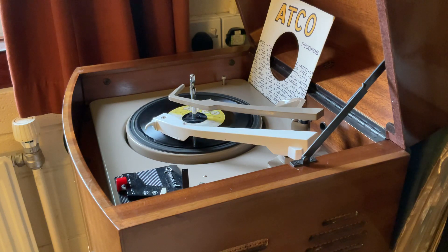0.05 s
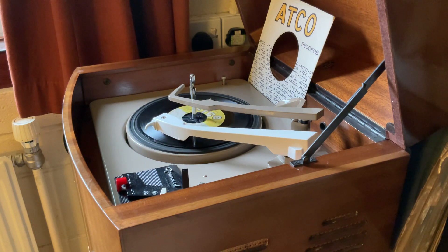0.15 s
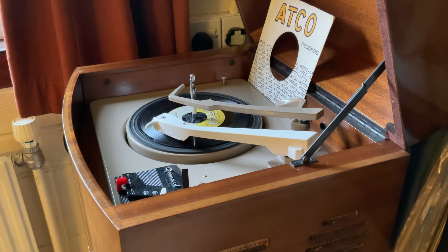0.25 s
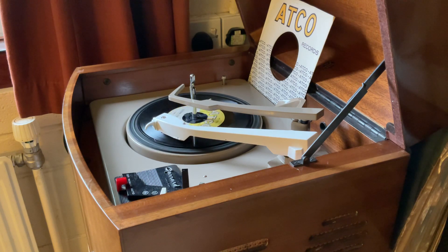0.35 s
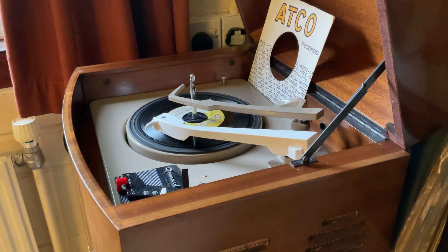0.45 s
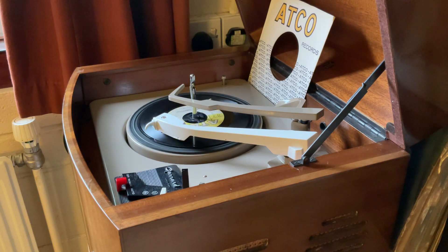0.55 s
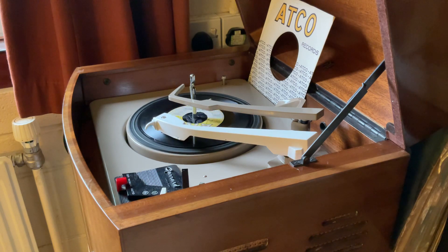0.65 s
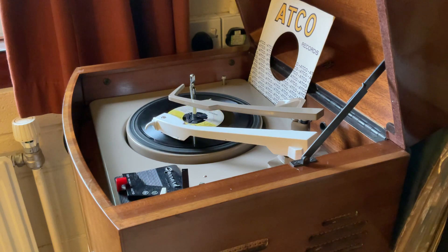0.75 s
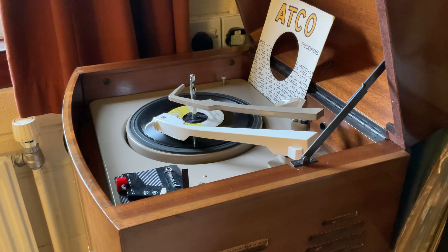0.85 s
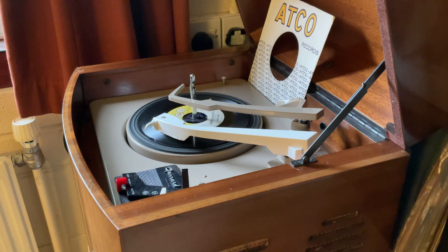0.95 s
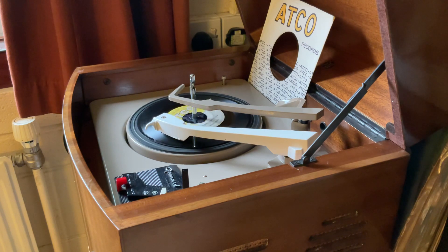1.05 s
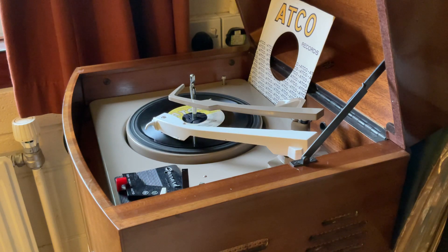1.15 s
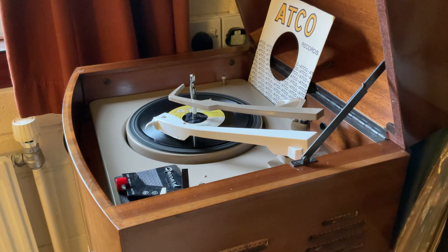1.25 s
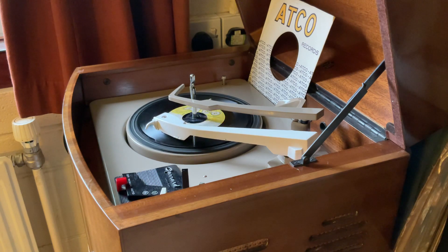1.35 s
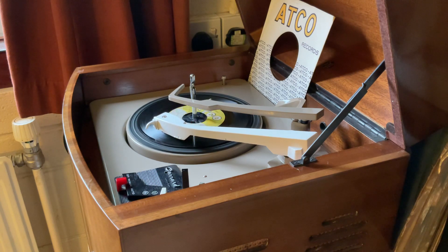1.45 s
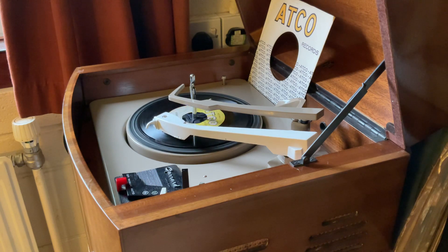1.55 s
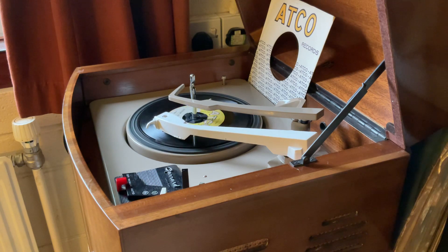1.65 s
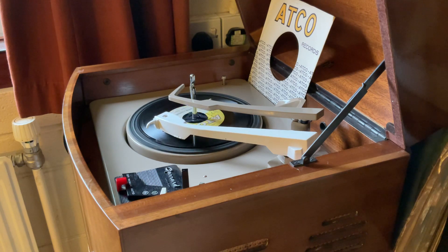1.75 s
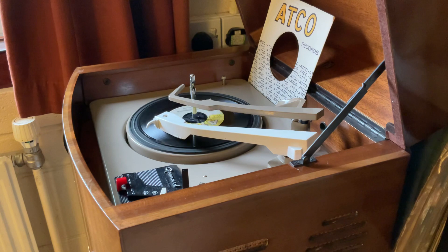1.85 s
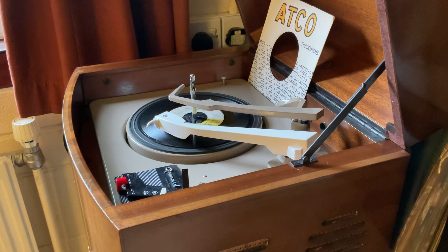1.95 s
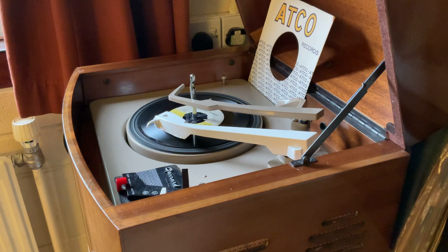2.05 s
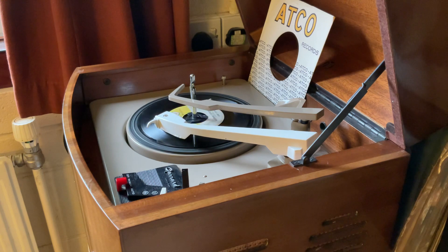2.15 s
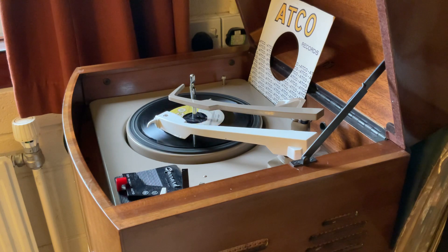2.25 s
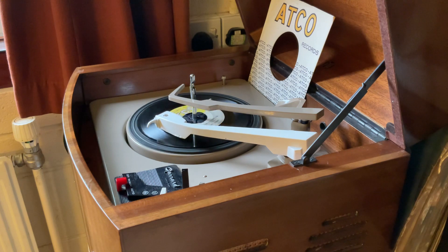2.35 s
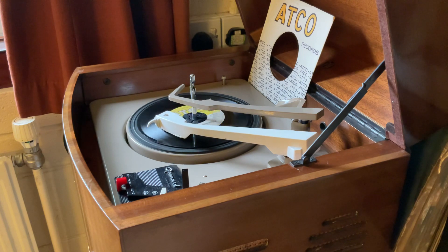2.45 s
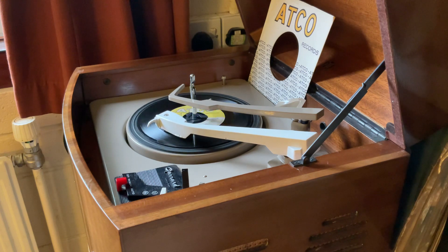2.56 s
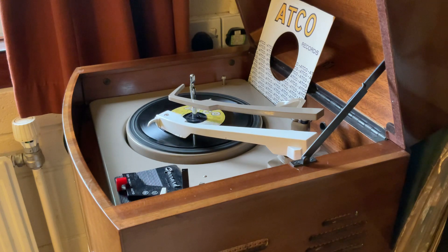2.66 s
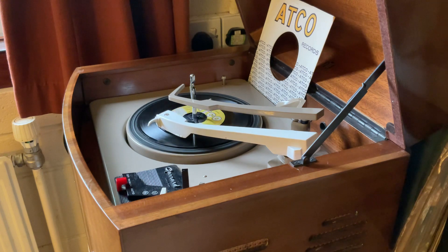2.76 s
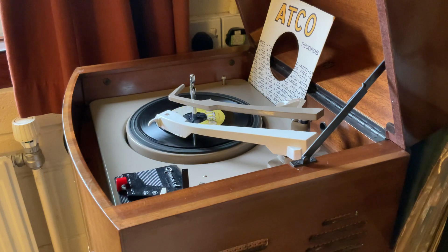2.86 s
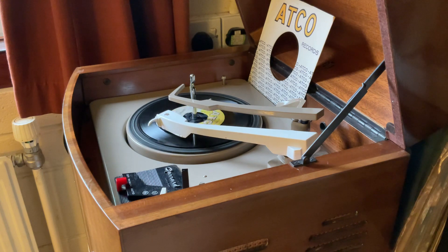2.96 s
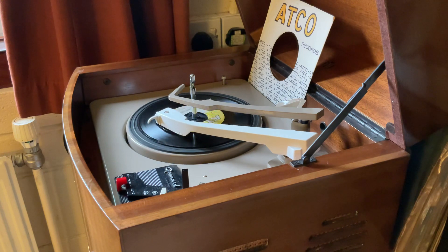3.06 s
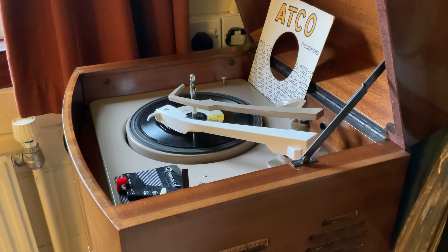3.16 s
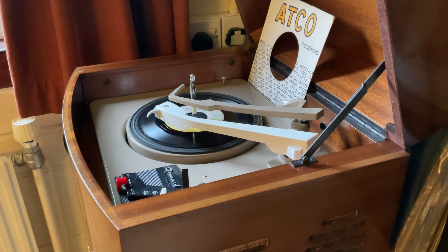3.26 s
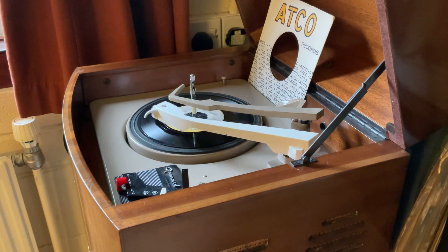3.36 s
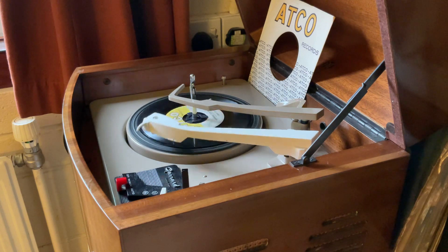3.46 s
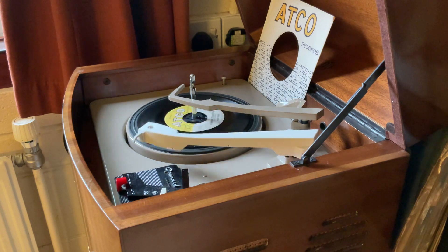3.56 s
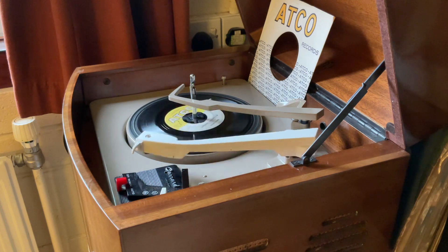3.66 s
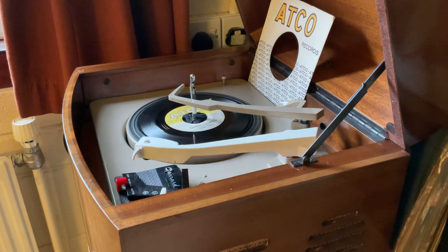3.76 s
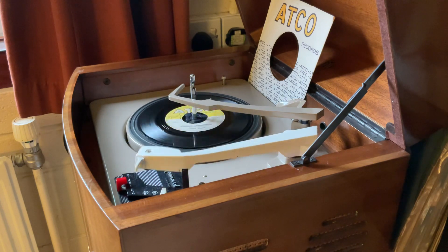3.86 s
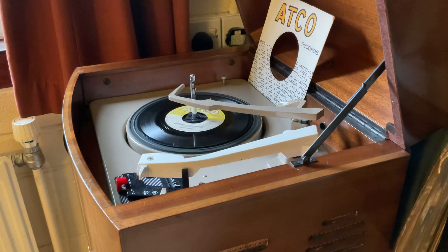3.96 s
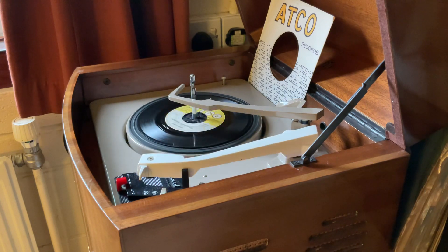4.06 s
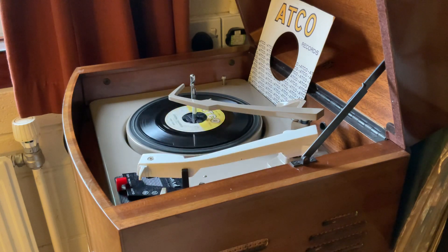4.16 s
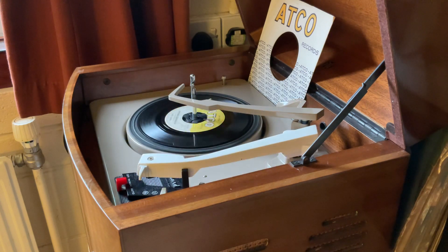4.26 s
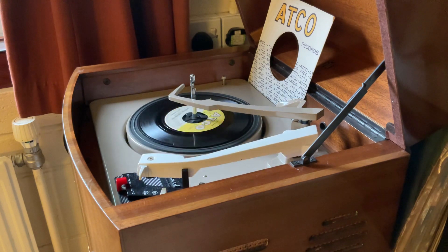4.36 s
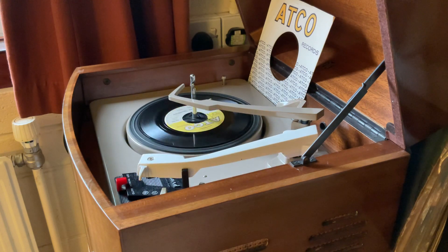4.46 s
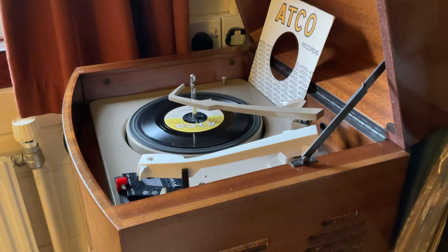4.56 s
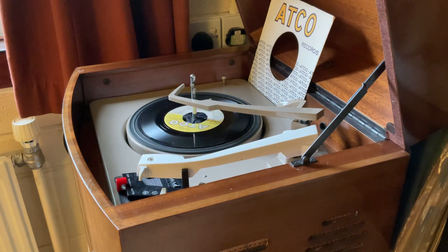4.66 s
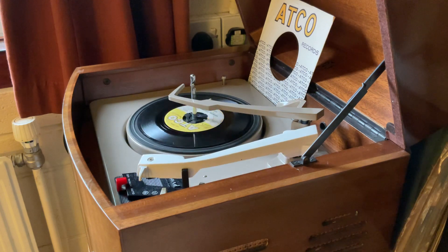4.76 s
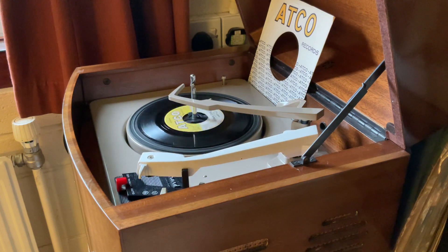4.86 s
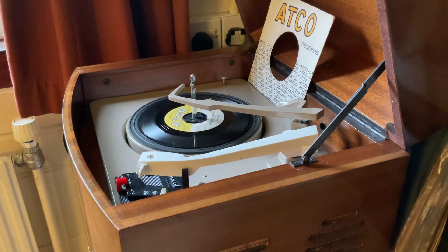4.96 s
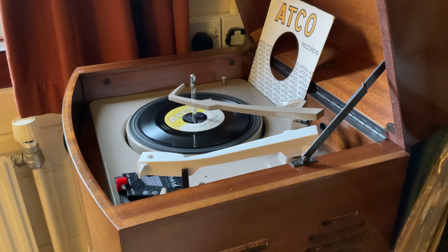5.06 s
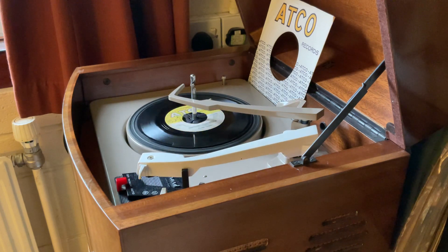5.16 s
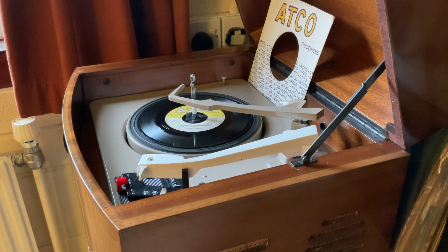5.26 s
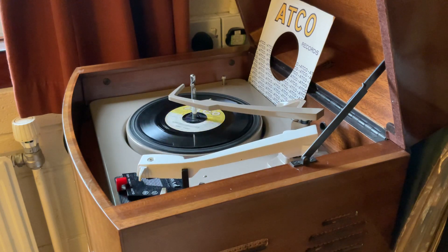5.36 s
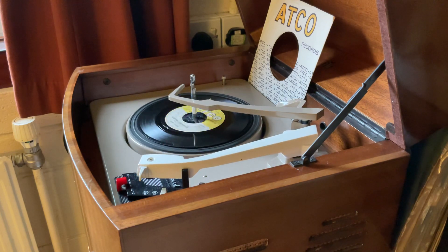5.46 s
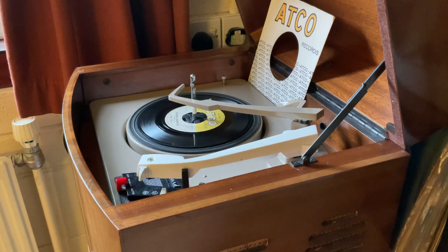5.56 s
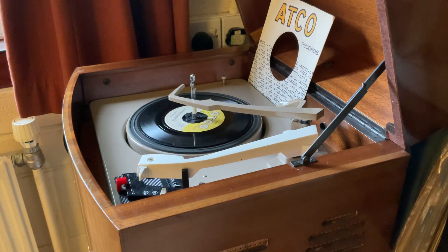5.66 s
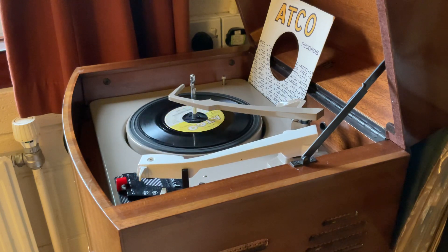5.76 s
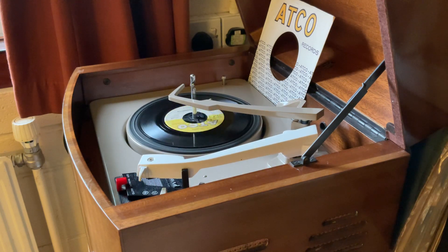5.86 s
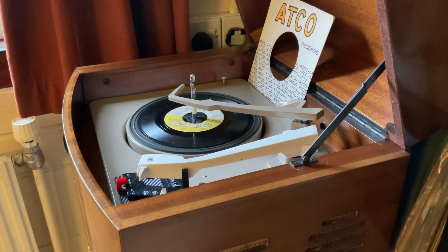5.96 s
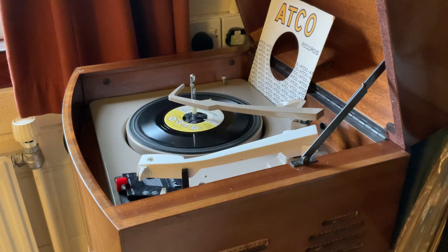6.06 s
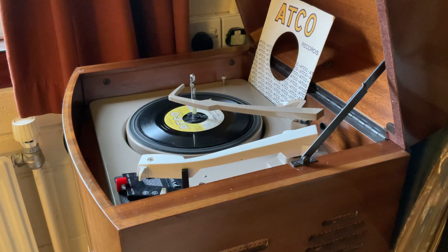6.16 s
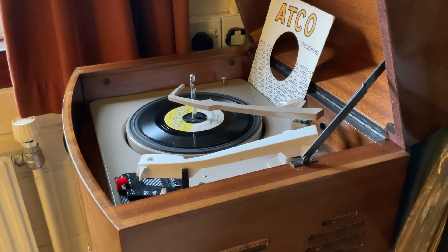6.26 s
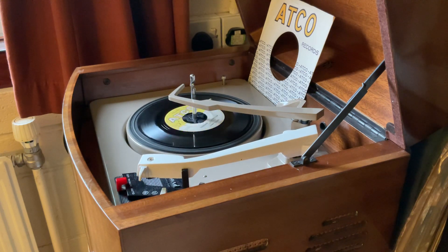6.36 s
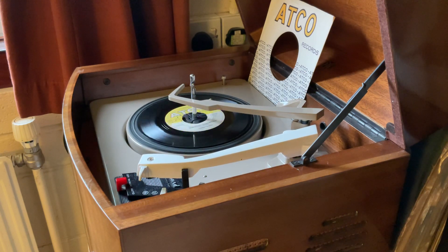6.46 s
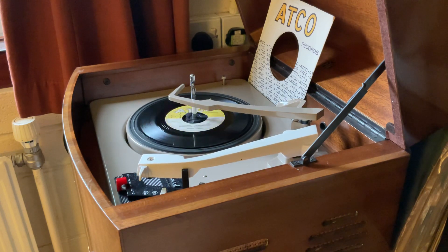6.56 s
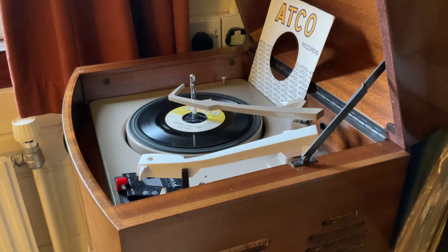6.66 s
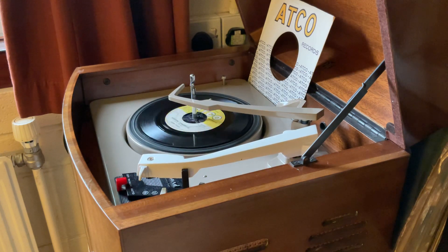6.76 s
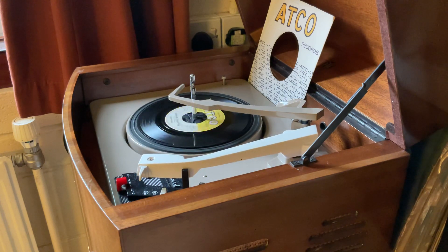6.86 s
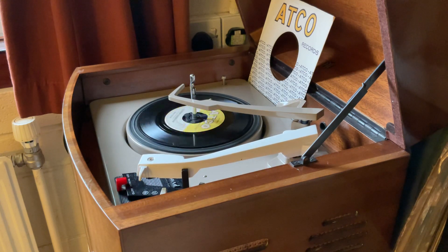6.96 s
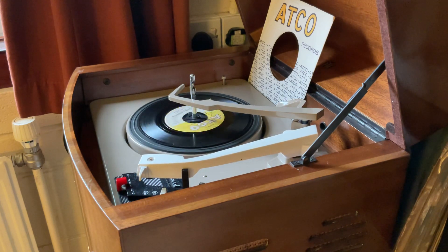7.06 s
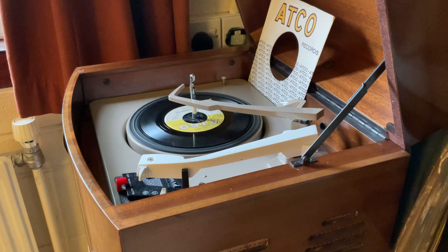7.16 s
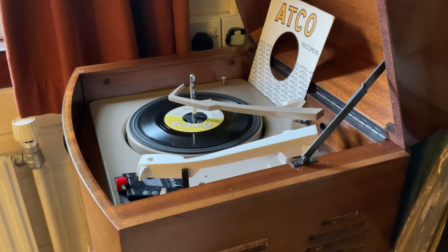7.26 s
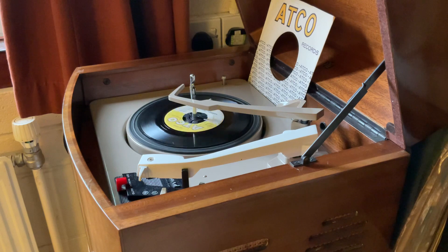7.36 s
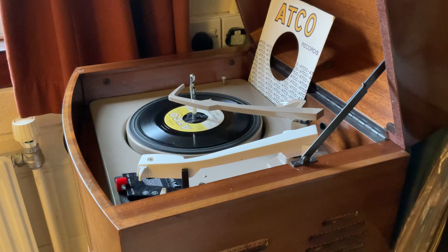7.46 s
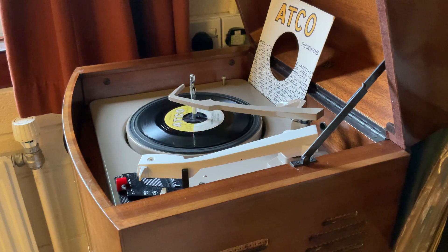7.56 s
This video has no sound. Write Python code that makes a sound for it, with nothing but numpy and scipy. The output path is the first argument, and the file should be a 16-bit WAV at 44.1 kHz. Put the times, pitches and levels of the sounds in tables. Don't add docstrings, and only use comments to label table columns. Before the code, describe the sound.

Close stereo pickup of an old record changer in a wooden cabinet, in a furnished room. Low mains hum and faint worn-groove hiss with tiny pops come first. Then levers click and knock the wood, a scrape and dull thud follow, springs snap sharply as the arm swings out, and clunks mark its settling. Soft, quick gear ticks run on over the hum.

```python
import sys
import numpy as np
from scipy import signal
from scipy.fft import rfft, irfft, next_fast_len
from scipy.io import wavfile
from scipy.ndimage import uniform_filter1d, map_coordinates

SR = 44100
rng = np.random.default_rng(int(sys.argv[2]) if len(sys.argv) > 2 else 0)


def file_out(sig):
    cols = np.atleast_2d(sig).T
    lim = np.clip(cols, -1, 1)
    pcm = np.round(lim * 32767).astype(np.int16)
    wavfile.write(sys.argv[1], SR, pcm)


def gain_from_decibels(decibels):
    exponent = np.asarray(decibels, float) / 20
    return 10 ** exponent


N = 335160

# start in seconds, peak in dB, deck, plate and sparkle in dB.
LIFT_CONTACTS = [(2.3726, -47, -11, -5, 9), (2.3809, -41, -1, 0, 12.5), (2.4484, -31.5, -7.5, 3.5, -4),
                 (2.727, -47, -6, 8, -12), (2.754, -56.5, -6, 5, -14), (2.637, -62, 0, 8, -12),
                 (2.799, -66, 11, 9, -2), (2.826, -53.5, -10, -21, -7), (2.8486, -47.5, -13, -1, -8),
                 (2.8892, -57, 30, 21, -25), (2.95, -68, 18, 16, -10), (2.9644, -68, 7, -1, -3),
                 (2.976, -73, 13, 2, 8), (3.08, -36.5, 0.5, 2, -9), (3.084, -37, 5.5, 1, -5)]
SWING_CONTACTS = [(3.331, -53.5, 10.5, 6.5, -22), (3.407, -44.5, -0.5, 5.5, -20),
                  (3.4395, -54.5, 6, 3.5, -11), (3.476, -51.5, -7, -2, -10), (3.497, -30, 3, -3, -12),
                  (3.673, -48.5, -13, -6.5, -17), (3.7035, -54, 7, 1.5, -9), (3.7592, -64, 12, -1, -26),
                  (3.888, -64, 9, 8, -25), (3.97, -43, 19, 9, -8), (4.032, -32, -26, -4.5, -9),
                  (4.038, -25, -8, -5, 1.5), (4.043, -25, -0.5, -4.5, -12.5)]
PARK_CONTACTS = [(4.697, -55, 17, 5, -14.5), (4.72, -63.5, 14, 11, -20), (4.7654, -58.5, 7, 7.5, -40),
                 (4.8774, -70.5, 20.5, -4, -9), (4.9593, -76, 15.5, -4, -5), (5.044, -24, -16, -1, -10),
                 (5.058, -44, 8, 17, -10), (5.095, -56, 8, 20, -10), (5.3068, -60.5, 1.5, -17, -30),
                 (5.3994, -78, 9, 15, -25), (5.472, -74.5, 14, 23, -20), (5.5095, -54.5, -2, -1, -0.5),
                 (5.547, -40, -3, 8, -13), (5.669, -59.5, 7, 8.5, -25), (5.7, -63.5, 10, -4, -22),
                 (6.6181, -47, 4, 6, -9), (6.9825, -71.5, 10, 18, -21), (7.0254, -59, -4, 0, -5),
                 (7.04, -63, 8, 4, -6)]
GRAZES = [
    (3.0145, -44, 2, 1.3, -12),
]
SNAPS = [
    (3.484, -19, -7, -6.5, -9.5),
    (3.964, -24, -12, -14, -9),
    (4.003, -42, -8, -4, -12),
]
# start in seconds, peak in dB.
POPS = [(0.1374, -72), (0.2686, -62), (0.3894, -78), (0.4726, -73), (0.686, -68), (0.9958, -71),
        (1.354, -71), (1.67, -69), (1.8307, -67), (2.2896, -63)]
# deck in dB, plate in dB, sparkle in dB.
POP_COLOUR_DB = (12, 7.2, -8.5)
# low edge in Hz, high edge in Hz, room T60 in seconds, level in dB.
CONTACT_BANDS = [(329.4, 780, .3, 2.5), (978, 2010, 0.27, 3.5), (2180, 4040, 0.22, 0),
                 (4500, 6900, 0.19, -5), (7000, 11000, 0.19, -0.5), (11800, 23000, 0.11, -5)]
# start in seconds, pitch in Hz, level in dB, T60 in
# seconds.
RINGS = [(2.381, 9520, -23, 0.0219), (2.45, 1360, -41, 0.27), (2.452, 1330, -43, 0.4),
         (2.734, 1300, -46, 0.1), (2.733, 1320, -43, 0.24), (2.733, 1300, -58, 0.091),
         (2.849, 6480, -47, 0.075), (3.485, 6440, -18, 0.055), (3.484, 1420, -30.5, .07),
         (3.487, 637, -35, 0.097), (3.968, 480, -29, 0.1), (3.485, 8900, -36, 0.086),
         (3.486, 5260, -51, 0.28), (4.035, 3500, -29, 0.087), (4.044, 1414, -42.5, 0.35),
         (4.38, 1750, -60, .06), (4.66, 1600, -60, .06), (5.421, 1500, -57, .07),
              (5.472, 1500, -57, .06), (6.62, 800, -52, .07), (7.045, 800, -59, .06),
              (2.386, 2850, -53, .1), (2.451, 2900, -44, .08), (4.88, 8800, -75.5, 0.077),
              (4.88, 4500, -79, 0.069), (5.047, 1110, -31, 0.067), (5.045, 3640, -35.5, 0.14),
              (5.045, 1420, -46, 0.36), (5.045, 2293, -39, 0.13), (5.045, 4370, -39.5, .13),
              (5.045, 6980, -46, 0.21), (5.046, 8020, -35, 0.11), (5.548, 1788, -45.5, 0.11),
              (5.548, 1332, -47, 0.22), (6.62, 1427, -49.5, 0.096), (5.51, 5000, -58, .06),
              (5.51, 6380, -59, 0.13), (7.026, 3900, -65, 0.11), (7.027, 10540, -58, 0.063)]
BLOW_TONES = [(.268, 750, -59, .06), (.268, 3400, -66, 0.058), (.268, 2010, -60, .03),
              (.268, 6360, -70, .04), (.472, 2300, -67, .04), (2.379, 5430, -43.5, 0.066),
              (2.379, 6890, -41.5, .045), (2.379, 6000, -47, .05), (2.379, 1230, -42, .1),
              (2.381, 4420, -46, .06), (2.448, 1222, -29, 0.088), (2.449, 1594, -34, .05),
              (2.449, 5300, -41, .05), (2.449, 6864, -39.5, .04), (2.449, 3900, -43, 0.08),
              (2.645, 1350, -57, .15), (2.728, 1730, -48, .1), (2.728, 5450, -53, .05),
              (2.728, 7000, -53, .14), (2.756, 1200, -46, .08), (3.016, 1712, -45, .15),
              (3.016, 3690, -53, .06), (3.016, 5290, -55, .08), (3.084, 1879, -45, .09),
              (3.084, 1400, -47, .1), (3.084, 5290, -46, .07), (3.409, 1694, -48, .06),
              (3.485, 1650, -27, .06), (3.485, 5230, -29, .05), (3.485, 3400, -33, .07),
              (3.485, 4350, -38, 0.066), (3.5, 1900, -39, 0.13), (3.502, 884, -40, 0.11),
              (3.964, 5820, -34, .035), (3.968, 800, -36, .09), (3.968, 1800, -42, .08),
              (4.039, 1780, -29, .08), (4.041, 1104, -38, .11), (4.04, 3720, -34.5, 0.087),
              (4.039, 5280, -35, .07), (4.039, 6300, -33, .06), (4.7, 1750, -57, .08),
              (4.768, 1750, -56, .1), (4.768, 3840, -63, .07), (5.045, 1700, -28, 0.083),
              (5.045, 3960, -37.5, .07), (5.045, 5210, -42.5, 0.093), (5.05, 2830, -43.5, .12),
              (5.085, 1454, -48, .22), (5.963, 2950, -67, .04)]
# centre in Hz, width in Hz, level in dB.
STEEL_MODES = [(1122, 49, -5), (1230, 16, 2.5), (1730, 80, -8.5), (2310, 55, -5.5), (3640, 87, -15.5),
               (3820, 32, -12.5), (4374, 51, -10), (4854, 52, -34.5), (5370, 49, 0.5), (5820, 68, -6.5),
               (5930, 95, -16), (7100, 9.1, -10), (6940, 120.4, -28), (8370, 39, -1.5), (8430, 80, -1),
               (8940, 40, -12), (10200, 44, -5.5), (11057, 170, -16)]
# start in seconds, peak in dB, main pitch in Hz.
KNOCKS = [(2.38, -26.5, 222), (2.4, -27.5, 272), (2.454, -23.5, 215.5), (2.472, -26.5, 205),
          (2.648, -41.5, 198), (2.743, -40, 200), (2.837, -30, 215), (3.018, -37, 470), (3.051, -35, 329),
          (3.088, -33.5, 471), (3.409, -32, 222), (3.489, -30.5, 426), (3.504, -28, 388),
          (3.971, -19.5, 215.6), (3.999, -27, 305), (4.046, -27.5, 289), (4.706, -31, 217),
          (4.708, -37, 420), (5.054, -25, 450), (5.073, -33.5, 178), (5.553, -38, 198.7),
          (6.623, -42.5, 206)]
# pitch in Hz, level in dB, T60 in seconds.
BOX_MODES = [(140, -8, 0.14), (204.7, -3.5, 0.12), (240, 6.5, 0.031), (292.4, -4, 0.1304),
             (356.7, -8.5, 0.075), (450, -12.5, .1), (582, -17.5, .06), (784, -18, .05)]
# pitch in Hz, level in dB, T60 in seconds.
DROP_MODES = [(108.4, -11, 0.15), (150, -17, .12), (201.9, -13, 0.15), (228, 1, .05), (288, -26, 0.35),
              (336.3, -13, 0.055), (484, -26, 0.14), (610, -36, 0.07), (830, -23.5, 0.023)]
# time in seconds, teeth passed.
MESH = [
    (3.212, 0),
    (3.884, 10),
    (4.236, 15),
    (4.652, 21),
    (5.225, 29),
    (5.42, 32),
    (5.723, 37),
]
PINION_DB = [-63.5, -59, -61.5, -62, -66, -65, -66, -62, -70, -67, -62, -70, -63, -73, -62, -74, -77, -63,
             -61.5, -68]
# start in seconds, high modes in dB, low modes in dB.
LAST_TEETH = [(5.7228, -64, -64), (5.7877, -61, -64), (5.86, -66, -66), (5.92, -62, -65),
              (5.9837, -59, -60.5), (6.0416, -59, -58.5), (6.1119, -64.5, -56), (6.1718, -62, -57),
              (6.2511, -62, -64), (6.315, -62, -61), (6.388, -63, -59), (6.4457, -68.5, -67),
              (6.509, -65, -65), (6.577, -60, -63), (6.7025, -68, -65), (6.7679, -72, -66),
              (6.8493, -62.5, -66), (6.9081, -73, -63), (6.982, -58, -60), (7.0388, -60, -56),
              (7.1002, -60, -60), (7.1737, -66.5, -60), (7.2339, -60.5, -62), (7.3034, -63.5, -60),
              (7.3626, -65, -59), (7.4416, -59, -58), (7.5048, -70, -61), (7.5711, -71, -60)]
# pitch in Hz, level in dB, T60 in seconds.
TICK_HIGH_MODES = [(1780, 1, 0.054), (2150, -15, 0.04), (1500, -9, .04)]
# pitch in Hz, level in dB, T60 in seconds.
TICK_LOW_MODES = [(781, 3.5, 0.055), (1020, -4, .04), (1282, 1, .045), (560, -2, .05)]
# time in seconds, deck scrape in dB.
CAM_LOAD = [(2.2, -85.5), (2.38, -69), (2.56, -60), (2.9, -56.5), (2.99, -59.5), (3.13, -77), (3.37, -63.5),
            (3.51, -56), (3.7, -66), (4.02, -60.5), (4.38, -74.5), (4.94, -67.5), (5.3, -71), (6.44, -77.5),
            (7.6, -73.5)]
# frequency in Hz, density in dB per Hz.
SLIDING_SPECTRUM = [(1500, -59.5), (2300, -1), (4400, 1), (5500, -5.5), (10000, -8), (13000, -60)]
# time into the turn in seconds, hiss in dB.
GROOVE_WEAR = [
    (0, -88.5),
    (.19, -79),
    (.25, -85),
    (.32, -71.5),
    (.47, -83),
    (.69, -83),
    (.76, -91),
    (1.08, -82.5),
    (1.3, -91),
]
# frequency in Hz, density in dB per Hz.
GROOVE_SPECTRUM = [(2000, -120), (2600, -38), (3500, -11.5), (5000, -27), (5900, -14.5), (10300, -15.5),
                   (11800, -3.5), (13000, 1.5), (15000, -3.5), (16000, -13)]
# time in seconds, hiss in dB.
TRIP_DRAG = [
    (2.28, -78),
    (2.548, -75.5),
    (2.624, -70),
    (2.87, -79),
    (2.9, -92),
]
# frequency in Hz, density in dB per Hz.
DRAG_SPECTRUM = [(4120, -34.5), (7000, -15.5), (8730, -5.5), (10400, -10.5), (13000, 1.5), (16200, -6.5)]
# multiple of the magnetic pull, level in dB.
HUM_HARMONICS = [(1, -51), (2, -52), (3, -68), (4, -76.5)]
# pitch in Hz, level in dB.
ROTOR_TONES = [(59.3, -70), (355, -78.5), (576, -82.5), (1061, -80.5), (1326, -89.5), (1459, -89.5)]
# frequency in Hz, density in dB per Hz.
RUMBLE_SPECTRUM = [(25, -120), (35, -19.5), (58, -1.5), (85, -8), (120, -2.5), (180, -4), (250, -3),
                   (330, -10), (450, -14.5), (700, -19), (1100, -22), (1800, -31), (2300, -38),
                   (3000, -120)]
# frequency in Hz, density in dB per Hz.
BEARING_SPECTRUM = [(5500, -60), (5750, -2.5), (5950, -4), (6200, -60)]
# frequency in Hz, density in dB per Hz.
AIR_SPECTRUM = [(1180, -37.5), (2000, -3), (2140, -2.5), (2800, -10), (3450, -11), (5440, -15.5),
                (7120, -13), (7700, -17.5), (13200, -17.5), (16000, -39)]
# frequency in Hz, likeness from 0 to 1, left over right in dB.
PORTS = [(60, 1, -.5), (100, 1, -1.3), (200, 0.99, 1.66), (499.6, 0.63, -1), (870, 0.26, 8.5),
         (1355, .55, -0.5), (1720, 0.95, 0), (2030, 0.53, -1.5), (2930, 0.34, -4), (4400, 1, 0),
         (5500, .88, -4.5), (6940, 0.42, -0.5), (8600, 1, -1.5), (16010, 0.73, 1)]
# frequency in Hz, lead of the left in radians.
LEFT_LEAD = [(60, .1), (200, .3), (690, .7), (1200, .2), (1720, -.7), (2400, -2.4), (2930, -3.3),
             (3450, -4.9), (4300, -6.2), (5500, -6.1), (6900, -5.8), (8600, -6.28), (16000, -6.5)]

RATTLE_S, GRAZE_S, SNAP_S, POP_S = .012, .03, .0074, .0049
THUD_S, KNOCK_T60_S = 2.8895, .1
TOOTH_LOW_DB, TOOTH_SCATTER_S, TOOTH_SCATTER_DB = -63.5, .002, 1.5
LOAD_MID_DB, GROAN_DB, GROAN_POWER, SLIDE_DB, SLIDE_POWER = -65.5, -57, 1.2, -86, 1.4
TURN_S, TURN_GAIN_DB, STYLUS_OFF_S = 4 / 3, 3.5, 2.3
MAINS_HZ, TOP_HZ = 99.987, 16150
NEAR_SPREAD = .78


def unit(x):
    return x / np.sqrt(np.mean(x ** 2) + 1e-20)


def along(hz, at_hz, values):
    return np.interp(np.log(hz + 1), np.log(np.asarray(at_hz) + 1), values)


def curve(rows):
    s, db = np.transpose(rows)
    return gain_from_decibels(np.interp(np.arange(N) / SR, s, db, left=-140, right=-140))


def wobble(rate_hz):
    coarse = np.arange(0, N + 16, 16)
    knots = rng.standard_normal(int(N * rate_hz / SR) + 4)
    return np.interp(np.arange(N), coarse, map_coordinates(knots, [coarse * rate_hz / SR]))


def filtered(x, response):
    m = next_fast_len(N + SR // 2)
    return irfft(rfft(x, m) * response(np.fft.rfftfreq(m, 1 / SR)), m)[..., :N]


def coloured(x, spectrum):
    return unit(filtered(x, lambda hz: gain_from_decibels(along(hz, *np.transpose(spectrum)))))


def noise(spectrum):
    return coloured(rng.standard_normal((2, N)), spectrum)


def band(lo_hz, hi_hz):
    rise = [(lo_hz * .6, -120), (lo_hz * .85, -20), (lo_hz, 0)]
    return rise + [(hi_hz, 0), (hi_hz * 1.15, -20), (hi_hz * 1.5, -120)]


def patchy(paths, patchy_db, size):
    z = signal.stft(paths, nperseg=512)[2]
    field = uniform_filter1d(rng.standard_normal(z.shape[1:]), size[0], 0)
    field = uniform_filter1d(field, size[1], 1)
    return unit(signal.istft(z * gain_from_decibels(patchy_db * unit(field)), nperseg=512)[1][:, :N])


def add(paths, s, sound):
    i = round(s * SR)
    paths[:, i:i + sound.shape[-1]] += sound[..., :N - i]


def ring(hz, db, t60_s, attack_s, rough=0., spread=1.):
    t = np.arange(min(SR // 3, int(SR * t60_s))) / SR
    walk = np.cumsum(rng.standard_normal(700)) / 45
    drift = rough * np.interp(t, np.arange(700) / 2000, walk)
    phase = [[0], [spread * rng.uniform(0, 2 * np.pi)]]
    envelope = gain_from_decibels(db - 60 * t / t60_s) * (1 - np.exp(-t / attack_s)) ** 2
    return envelope * np.sin(2 * np.pi * hz * t + drift + phase)


def steel(hz):
    modes = sum(gain_from_decibels(db - 2) * 1j * hz * w / (c * c - hz * hz + 1j * hz * w) for c, w, db in STEEL_MODES)
    return gain_from_decibels(-3) + modes


def levers():
    t = np.arange(SR // 3) / SR
    near, room = np.zeros((2, len(CONTACT_BANDS), N))
    decay = np.array([(1 - np.exp(-t / .0082)) * gain_from_decibels(-120 * t / t60) for _, _, t60, _ in CONTACT_BANDS])
    crack = np.array([6.1 * lo / 11000 * np.exp(-t / .002) for lo, *_ in CONTACT_BANDS])

    contacts = [(*row, RATTLE_S) for row in LIFT_CONTACTS + SWING_CONTACTS + PARK_CONTACTS]
    contacts += [(*pop, *POP_COLOUR_DB, POP_S) for pop in POPS]
    contacts += [(*row, GRAZE_S) for row in GRAZES]
    contacts += [(*row, SNAP_S) for row in SNAPS]
    for s, db, deck_db, plate_db, sparkle_db, rattle_s in contacts:
        band_db = np.array([deck_db, plate_db, 0, 0, sparkle_db, sparkle_db])
        power = gain_from_decibels(2 * (db - 10.5 + band_db))[:, None]
        rattle = np.exp(-t / np.clip(rattle_s / 2, .0005, .05))
        add(near, s - .001, power * (1 - np.exp(-t / .0016)) * (rattle + crack))
        add(room, s, power * decay * rattle_s / .017)

    chatter = gain_from_decibels(2.9 * wobble(400))
    stack = patchy(rng.standard_normal((2, N)), patchy_db=4, size=(2, 20))
    out = np.zeros((2, N))
    for (lo, hi, _, db), direct, tail in zip(CONTACT_BANDS, near, room):
        envelope = np.sqrt(direct * chatter ** 2 + gain_from_decibels(-13) * tail)
        out += gain_from_decibels(db) * envelope * coloured(stack, band(lo, hi))
    for s, hz, db, t60_s in RINGS:
        add(out, s, ring(hz, db, t60_s, attack_s=.0007, rough=.0052 * hz))
    return out


def tones():
    out = np.zeros((2, N))
    for s, hz, db, t60_s in BLOW_TONES:
        add(out, s, ring(hz, db, t60_s, attack_s=.00055, rough=.006 * hz))
    return out


def cabinet():
    out = np.zeros((2, N))
    for s, db, hz in KNOCKS:
        for c, mode_db, t60_s in BOX_MODES:
            pitch_hz = c * (1 + .047 * rng.normal())
            level_db = db - 2.5 + mode_db + rng.normal(0, 2.7)
            add(out, s + .5 / c, ring(pitch_hz, level_db, min(t60_s, KNOCK_T60_S), attack_s=.63 / c))
        add(out, s, ring(hz, db + .5, KNOCK_T60_S, attack_s=.43 / hz))
    for c, db, t60_s in DROP_MODES:
        add(out, THUD_S + 1 / c, ring(c, db, t60_s, attack_s=.57 / c, spread=.17))
    return out


def gear():
    out = np.zeros((2, N))
    s, passed = np.transpose(MESH)
    teeth = np.arange(int(passed[-1]))
    chance = rng.standard_normal((len(teeth) + len(LAST_TEETH), 8, 2))
    high_db = np.take(PINION_DB, teeth, mode="wrap") + TOOTH_SCATTER_DB * chance[teeth, -1, 0]
    low_db = TOOTH_LOW_DB + .3 * (high_db - np.mean(PINION_DB))
    at_s = np.interp(teeth, passed, s) - .002 + TOOTH_SCATTER_S * chance[teeth, -1, 1]
    ticks = [*zip(at_s, high_db - .7, low_db), *LAST_TEETH]
    modes = TICK_HIGH_MODES + TICK_LOW_MODES
    for (s, high, low), row in zip(ticks, chance):
        for (hz, mode_db, t60_s), base_db, (a, b) in zip(modes, [high] * 3 + [low] * 4, row):
            tick = ring(hz * (1 + .019 * a), base_db + mode_db + 2 * b, t60_s, attack_s=.0009, rough=14)
            add(out, s - .001, tick)
    return out


def cam():
    scrape = curve(CAM_LOAD)
    effort = scrape / gain_from_decibels(LOAD_MID_DB)
    groan = gain_from_decibels(GROAN_DB) * effort ** GROAN_POWER
    slide = gain_from_decibels(SLIDE_DB) * effort ** SLIDE_POWER
    groan_noise = noise([(60, -63.5), (100, -3.5), (220, 1.5), (300, -5.5), (480, -12), (700, -61)])
    low = groan * gain_from_decibels(2 + np.clip(2.5 * wobble(25), -9, 4)) * groan_noise
    mid = scrape * gain_from_decibels(-4.5 + 2.5 * wobble(30)) * unit(filtered(noise(band(600, 1900)), steel))
    hiss = patchy(noise(SLIDING_SPECTRUM), patchy_db=3.5, size=(3, 30))
    return low + mid + slide * gain_from_decibels(-1.5 + 3.3 * wobble(60)) * hiss


def stylus():
    t = np.arange(N) / SR
    wear_db = np.interp(t % TURN_S, *np.transpose(GROOVE_WEAR)) + TURN_GAIN_DB * t / TURN_S
    wear = gain_from_decibels(wear_db) * (t < STYLUS_OFF_S)
    grain = gain_from_decibels(2.9 * wobble(66) + 2.5 * wobble(300))
    groove = unit(grain * patchy(noise(GROOVE_SPECTRUM), patchy_db=4.5, size=(16, 8)))
    drag = unit(grain * patchy(noise(DRAG_SPECTRUM), patchy_db=3, size=(5, 30)))
    return wear * gain_from_decibels(2) * groove + curve(TRIP_DRAG) * gain_from_decibels(4) * drag


def motor():
    t = np.arange(N) / SR
    pull = 2 * np.pi * MAINS_HZ * t - .3
    hum = sum(gain_from_decibels(db + 2.5 + .4 * k * wobble(14)) * np.cos(k * pull) for k, db in HUM_HARMONICS)
    whine = 0
    for hz, db in ROTOR_TONES:
        level = gain_from_decibels(db + 3.5 + 1.8 * wobble(11))
        whine = whine + level * np.sin(2 * np.pi * hz * t + 1.5 * wobble(3.7))
    rumble = gain_from_decibels(-60 + .8 * wobble(3.7) + 1.5 * wobble(12)) * noise(RUMBLE_SPECTRUM)
    bearing_db = np.interp(t, [2.3, 4.2], [-101.5, -106]) + 4.4 * wobble(9)
    return hum + whine + rumble + gain_from_decibels(bearing_db) * noise(BEARING_SPECTRUM)


def air():
    return gain_from_decibels(-87.5) * noise(AIR_SPECTRUM)


def microphones(paths):
    port_hz, alike, balance_db = np.transpose(PORTS)

    def shares(hz):
        angle = np.arccos(np.clip(along(hz, port_hz, alike), 0, 1)) / 2
        return np.array([np.cos(angle), np.sin(angle)])

    def sides(hz):
        lead = np.exp(.5j * along(hz, *np.transpose(LEFT_LEAD)))
        left = gain_from_decibels(along(hz, port_hz, balance_db) / 2) * lead
        return np.array([left, 1 / left])

    same, other = filtered(paths, shares)
    return filtered(np.array([same + other, same - other]), sides)


def scene():
    blows = filtered(levers(), lambda hz: gain_from_decibels(5) * steel(hz)) + tones() + cabinet() + gear()
    steady = cam() + stylus() + motor()
    return microphones(blows * [[1], [NEAR_SPREAD]] + steady + air())


def band_limit(x):
    return signal.sosfilt(signal.butter(12, 16500, fs=SR, output="sos"), x)


def record(dry):
    def response(hz):
        bass_cut = (1j * hz / (50 + 1j * hz)) ** 2
        return bass_cut * np.clip((TOP_HZ - hz) / 500, 0, 1)

    mix = filtered(dry, response)
    return band_limit(mix)


dry = scene()
out = record(dry)
file_out(out)
```